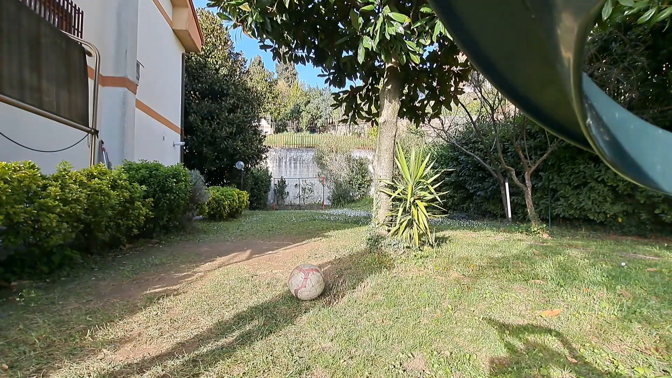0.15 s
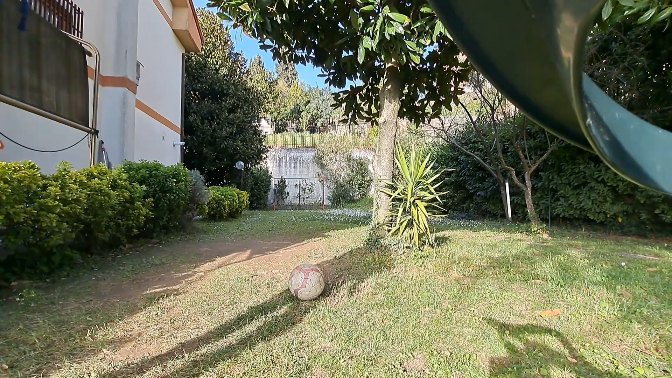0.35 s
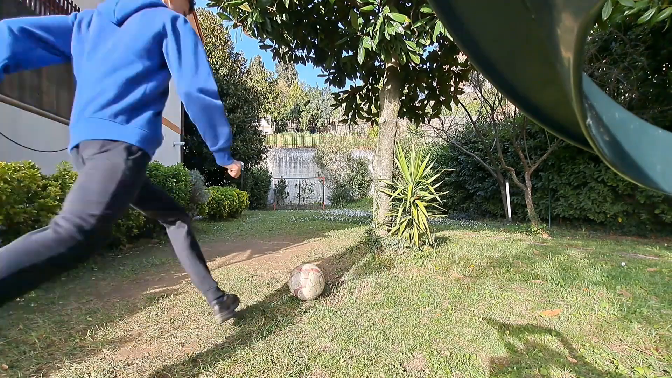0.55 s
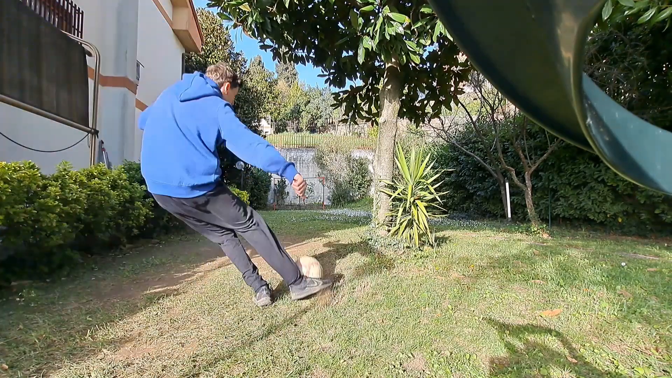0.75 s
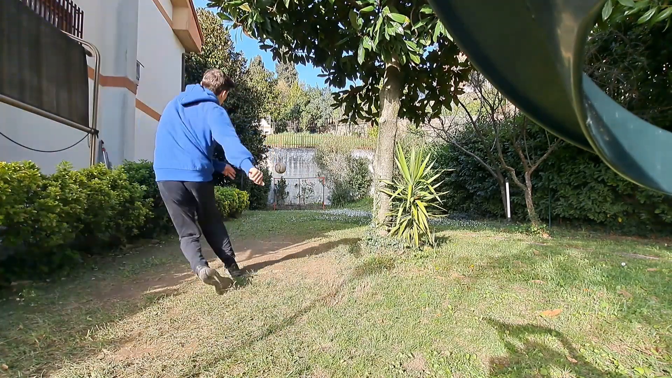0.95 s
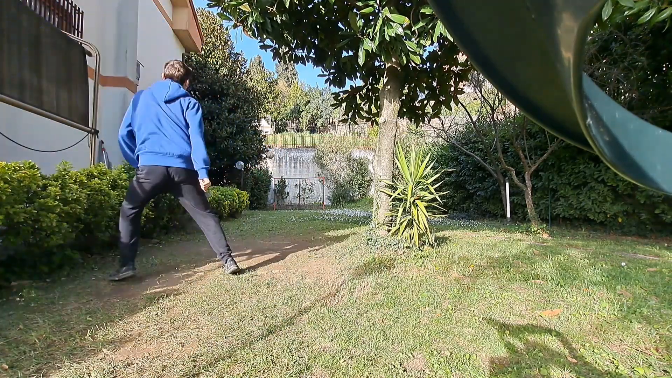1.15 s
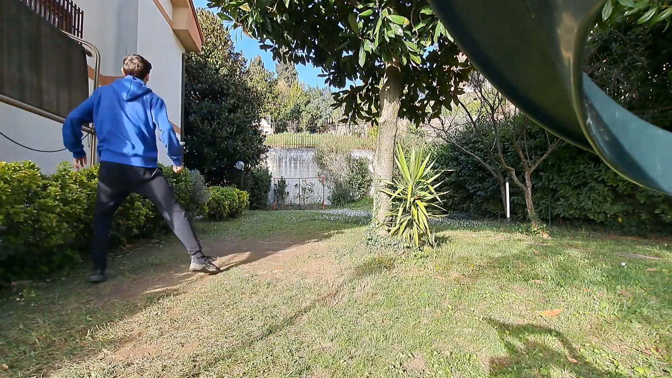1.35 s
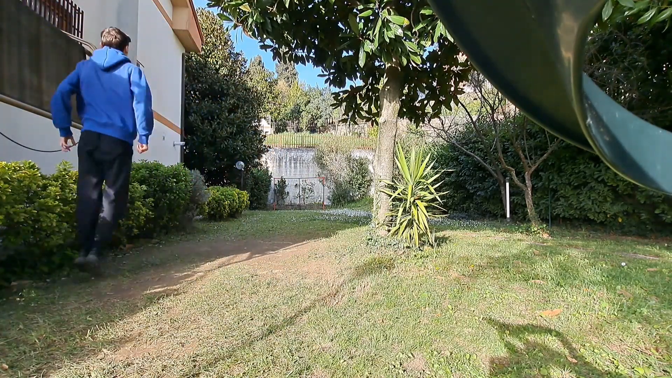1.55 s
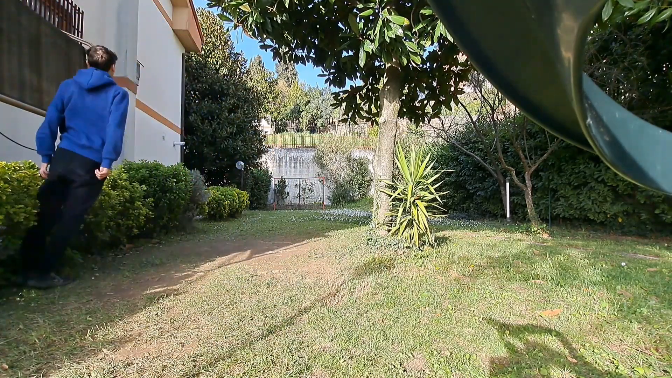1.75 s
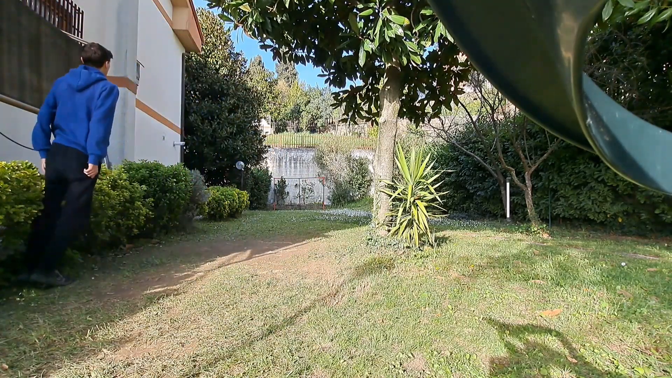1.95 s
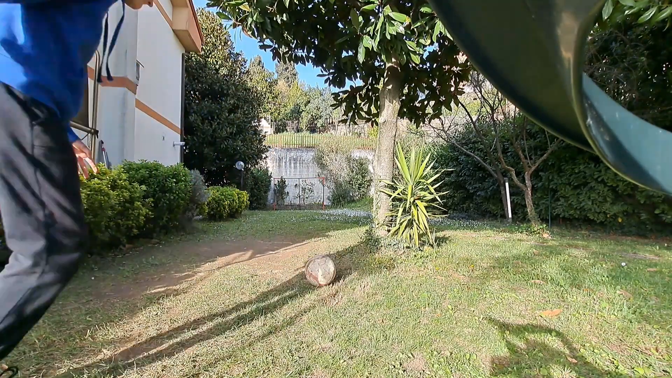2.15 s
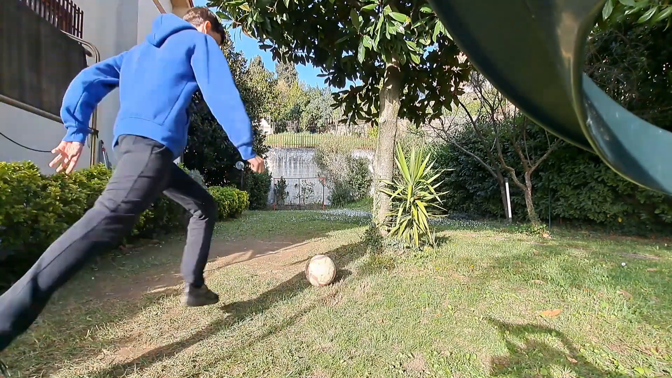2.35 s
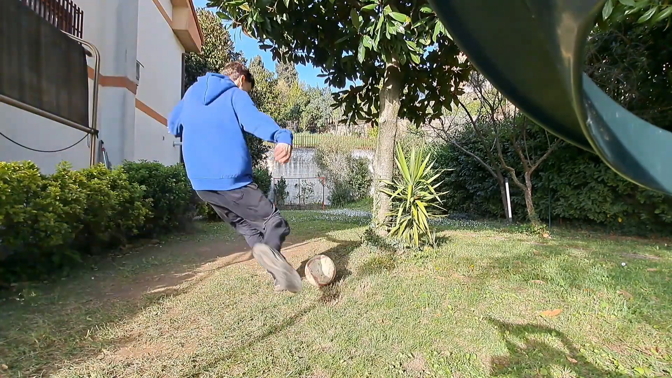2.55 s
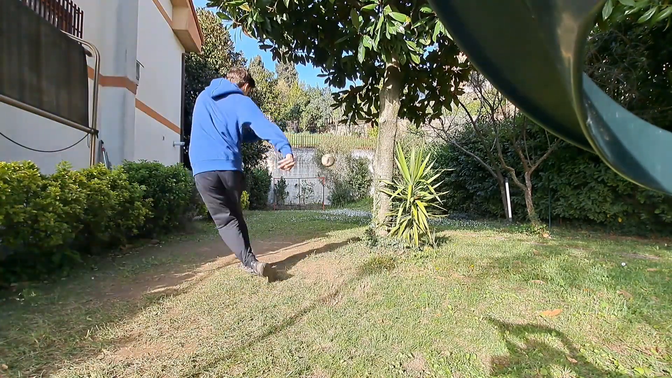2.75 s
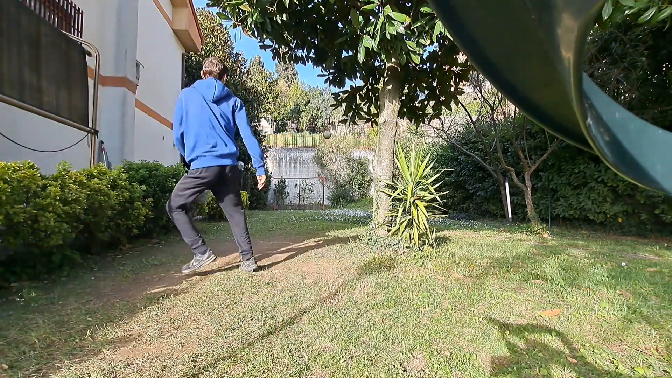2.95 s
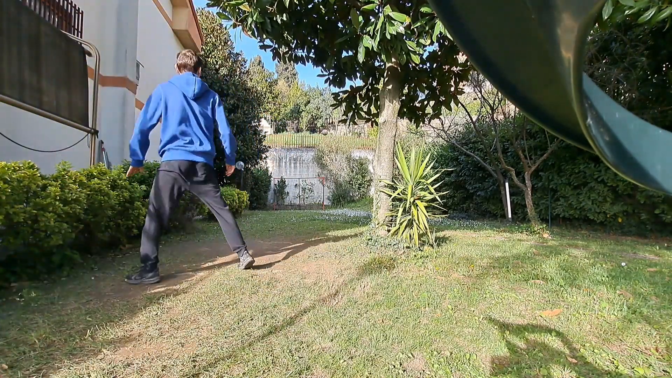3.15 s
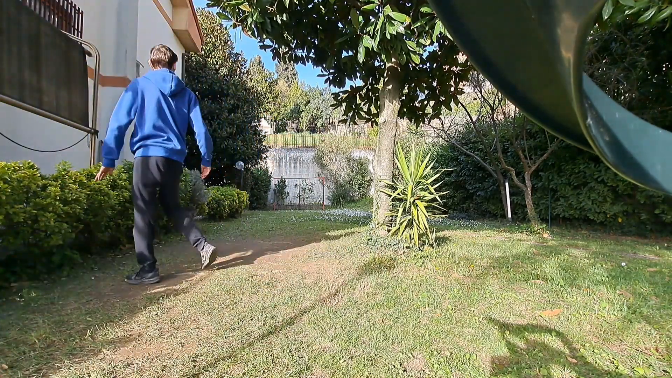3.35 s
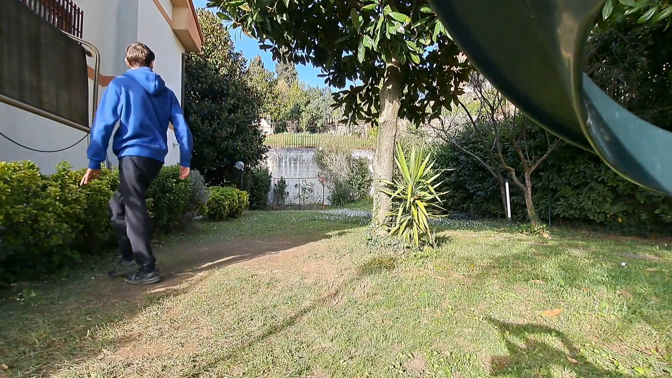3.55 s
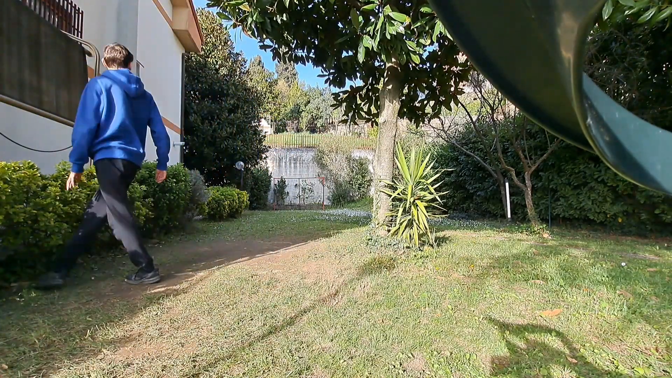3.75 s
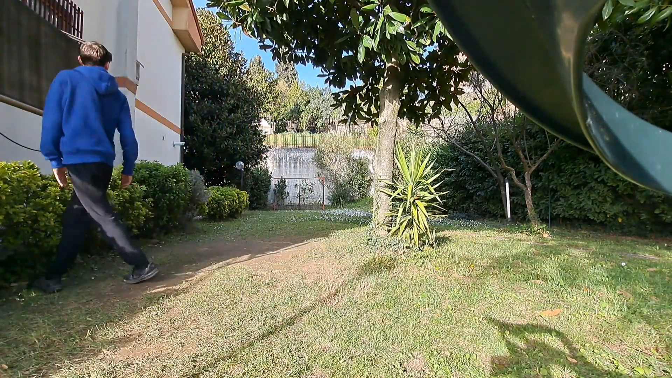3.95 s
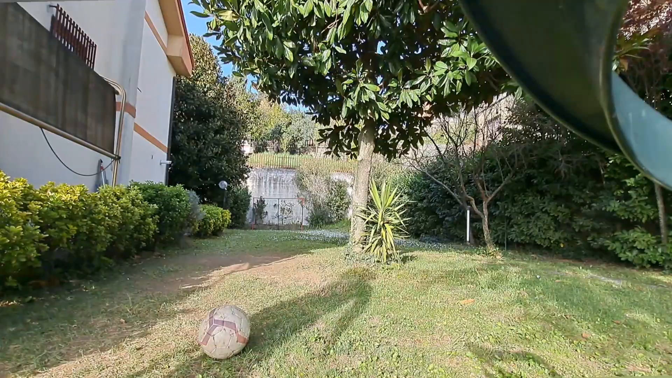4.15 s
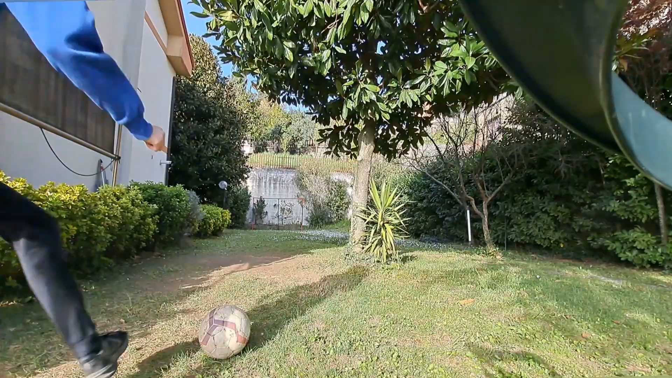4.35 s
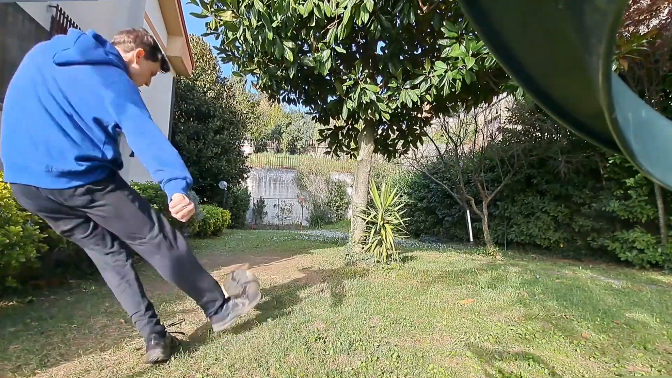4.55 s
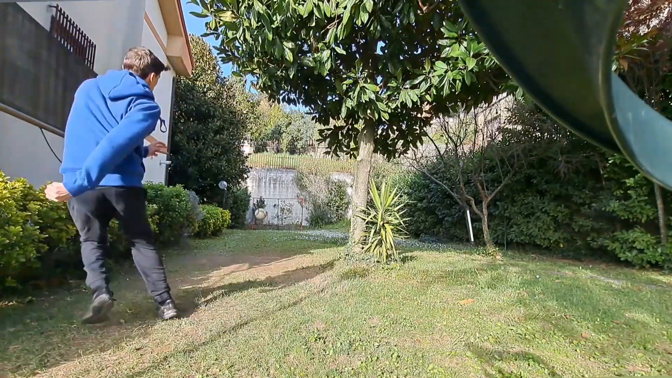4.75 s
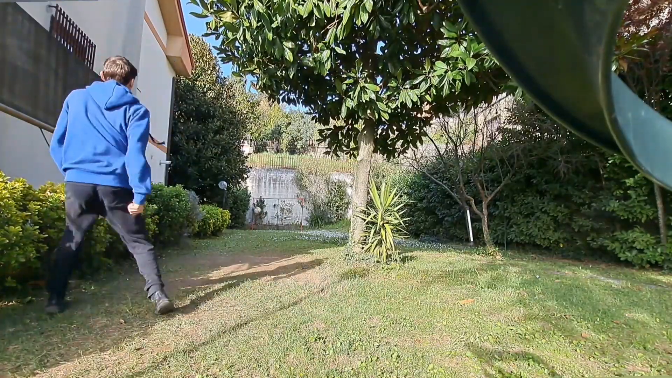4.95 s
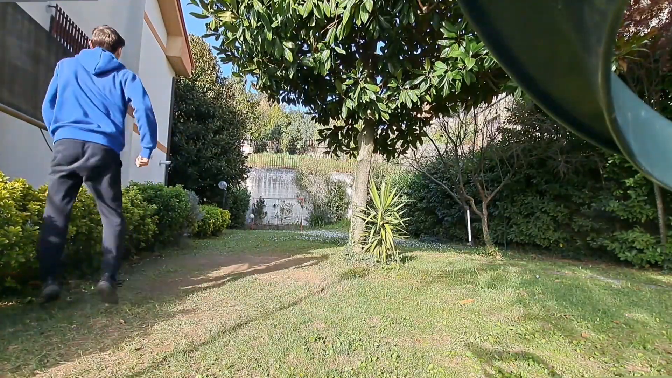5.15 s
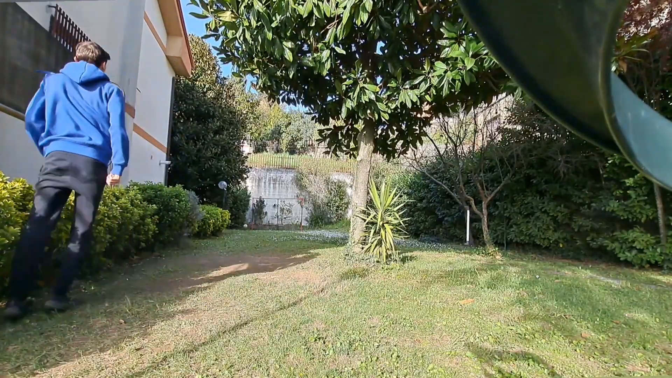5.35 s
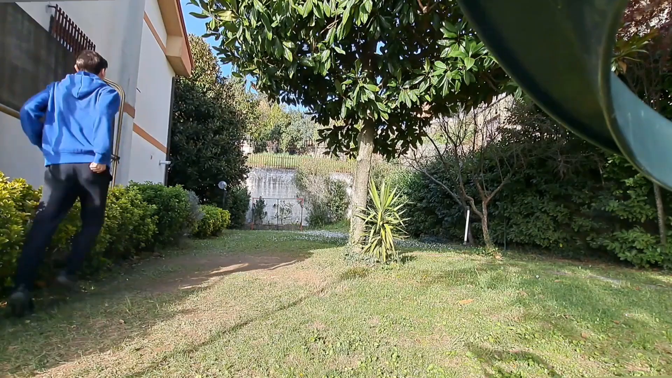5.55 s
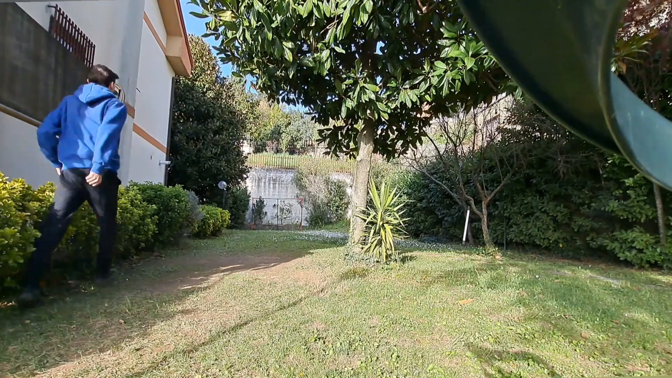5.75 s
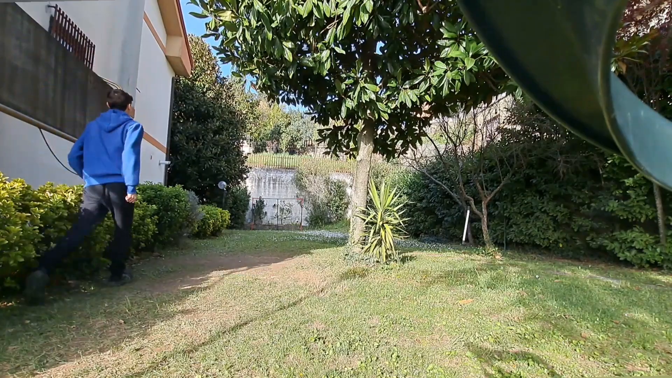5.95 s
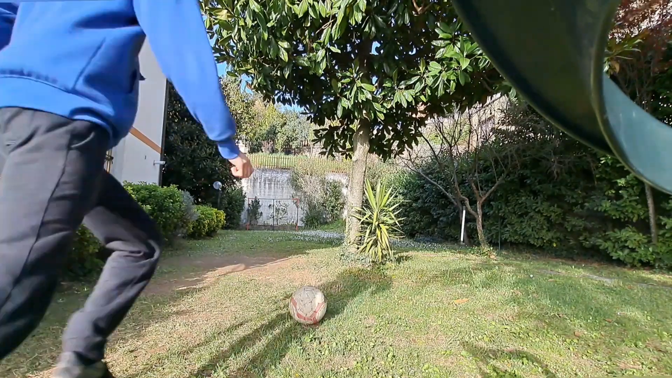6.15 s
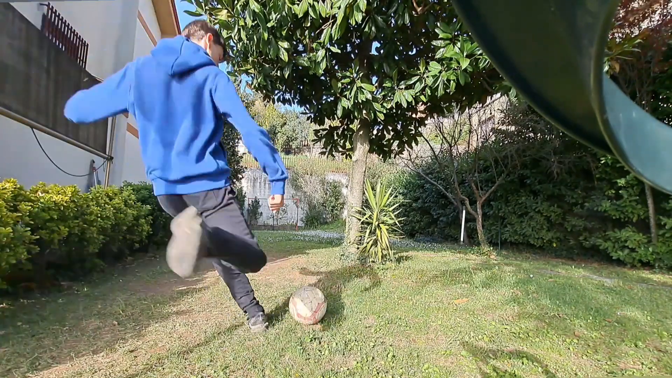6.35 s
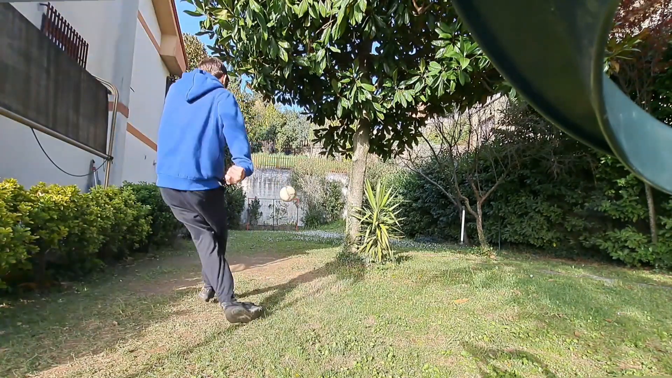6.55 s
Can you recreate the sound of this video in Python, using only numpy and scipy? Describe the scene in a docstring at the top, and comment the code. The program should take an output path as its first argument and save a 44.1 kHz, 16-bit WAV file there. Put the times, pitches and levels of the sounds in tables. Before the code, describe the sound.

Four hard football kicks land in a quiet garden, a few metres away and slightly left, at about 0.8, 2.6, 4.6 and 6.5 seconds. Each is a loud, deep thump with a sharp slap and a short echo from a wall and hedges. On the first and last, the boot skims the turf just before contact. At about 1.5 seconds the ball crashes into foliage with hissing leaves and two twig snaps. Fainter rustles come near 1.9, 3.7 and 5.6 seconds, and small wooden cracks near 2.7, 3.9 and 4.7 seconds. Around the kicks, much quieter footsteps thud in the soil and crunch dry grass, and trouser legs swish softly. Light wind puffs low against the microphone in the first half second, faintly around 4.2 seconds and again near 5.7 seconds.

```python
"""Four hard football kicks on a garden lawn, a few metres away, with a house wall on the left.
The boot dents the ball into a thump and a slap; the wall and the garden answer each kick.
The player runs up with thudding steps and swishing trouser legs, stirring grass and air.
The flying ball crashes through foliage, twigs snap, and light wind puffs at the microphone."""
import sys
import numpy as np
from scipy import signal
from scipy.fft import rfft, irfft, next_fast_len
from scipy.io import wavfile

SR = 44100
rng = np.random.default_rng(int(sys.argv[2]) if len(sys.argv) > 2 else 0)


def materialize(psi):
    """Save the field psi as 16-bit PCM at rate SR to the path in sys.argv[1].

    A 1-D psi becomes a single channel; in a 2-D psi each row is a channel.
    """
    bounded = np.clip(np.atleast_2d(psi).T, -1, 1)
    quanta = np.round(bounded * 32767).astype(np.int16)
    wavfile.write(sys.argv[1], SR, quanta)


N = 295029
TIME_S = np.arange(N) / SR

# boot meets ball: (time [s], level [dB], hardness [dB], slap [dB], garden answer [dB], left-right [dB])
KICKS = [(0.785, -1, 2.5, -26, -5.5, -2), (2.6075, 1.5, -1, -21, -8, -4),
         (4.5772, 0.45, 3.5, -22.5, -10, -2), (6.4622, 0, 2, -21, -8, -5.5)]
# spectra of ball skin, moving air and stirred grass: (frequency [Hz], level [dB])
SLAP_SPECTRUM = [(200, -20), (700, -2), (1500, 2), (3200, 0), (5000, -1), (8000, -5), (16000, -12)]
AIR_SPECTRUM = [(15, -46.5), (25, -16), (52, -0.5), (125, -9.5), (200, -17.5), (400, -29), (800, -55),
                (2000, -81)]
GRASS_SPECTRUM = [(150, 7), (450, 8), (1000, 0.5), (2000, -3.5), (3500, -5), (8000, -5), (16000, -7)]


def amp(db):
    """Decibels to gain."""
    return 10 ** (np.asarray(db) / 20)


def along(points, hz):
    """Read (Hz, value) points on a log axis."""
    f, v = np.transpose(points)
    return np.interp(np.log(hz + 1), np.log(f), v)


def pan(db):
    """Left and right gains for a level difference."""
    return amp(np.array([[db / 2], [-db / 2]]))


def filtered(x, response):
    """Apply a frequency response to x."""
    n = x.shape[-1]
    size = next_fast_len(n + SR // 4)
    return irfft(rfft(x, size) * response(np.fft.rfftfreq(size, 1 / SR)), size)[..., :n]


def shade(x, side_db):
    """Place a sound to one side; the microphone's housing shades mainly short waves."""
    shadow = [(400, 0.16), (2500, 0.36), (8000, 0.92)]  # (frequency [Hz], share of side_db [1])
    return filtered(x, lambda hz: amp(np.array([[side_db / 2], [-side_db / 2]]) * along(shadow, hz)))


def add(track, s, sound):
    """Mix a sound into a track at time s."""
    part = track[..., max(round(s * SR), 0):][..., :sound.shape[-1]]
    part += sound[..., :part.shape[-1]]


def noise(spectrum, n=N, grain_db=0, direct=0):
    """Stereo noise, mid rms 1; grain_db adds 1 ms crackles, direct is the share alike at both ports."""
    # scattered sound is alike only in the bass: (frequency [Hz], left-right likeness [1])
    likeness = [(100, .96), (300, .85), (700, .45), (1400, 0), (14000, 0)]
    ms = np.arange(n) * 1000 / SR
    knots = int(ms[-1]) + 2
    grains = amp(grain_db * np.interp(ms, np.arange(knots), rng.standard_normal(knots)))

    def mid_side(hz):
        angle = np.arccos(np.clip(direct + (1 - direct) * along(likeness, hz), -1, 1)) / 2
        return amp(along(spectrum, hz)) * [np.cos(angle), np.sin(angle)]

    mid, side = filtered(rng.standard_normal((2, n)) * grains, mid_side)
    return np.array([mid + side, mid - side]) / np.sqrt(np.mean(mid ** 2))


def burst(spectrum, rise_s, t60_s, grain_db):
    """A near puff of noise that swells and dies; rms 1 over its first 40 ms."""
    t = np.arange(SR // 2) / SR
    puff = noise(spectrum, len(t), grain_db, direct=0.48)
    puff *= (1 - np.exp(-t / rise_s)) * amp(-60 * t / t60_s)
    return puff / np.sqrt(np.mean(puff[:, :SR // 25] ** 2))


def stroke(spectrum, length_s, grain_db, direct=0):
    """Brushing: grainy noise that swells to mid-stroke and trails off."""
    u = np.arange(SR // 3) / SR / length_s
    return noise(spectrum, len(u), grain_db, direct) * (2 * u * np.exp(1 - 2 * u)) ** 2.4


def crack(t60_s):
    """A few milliseconds of bright noise."""
    t = np.arange(SR // 4) / SR
    envelope = (1 - np.exp(-t / .0006)) * amp(6 - 60 * t / t60_s)
    return noise(SLAP_SPECTRUM, len(t), grain_db=2, direct=.4) * envelope


def pulse(spectrum, size=16384):
    """Minimum-phase pulse with this spectrum."""
    cepstrum = irfft(np.log(amp(along(spectrum, np.fft.rfftfreq(size, 1 / SR)))))
    cepstrum[1:size // 2] *= 2
    cepstrum[size // 2 + 1:] = 0
    return irfft(np.exp(rfft(cepstrum)))


def swell_db(s, hold_s, rise_db_per_s, fall_db_per_s):
    """Level that climbs to 0 dB at time s, holds, then sinks."""
    return -rise_db_per_s * np.maximum(s - TIME_S, 0) - fall_db_per_s * np.maximum(TIME_S - s - hold_s, 0)


def gate(s):
    """1 throughout the kick's span that holds time s; abruptly 0 outside."""
    spans = [(0, 2.056), (2.056, 4.02), (4.02, 5.985), (5.998, 6.7)]  # one per kick: (start [s], end [s])
    return sum((TIME_S >= start) & (TIME_S < end) for start, end in spans if start <= s < end)


def garden(x, far_echo_s=.13, far_width_s=0.0075, far_gain=0.48):
    """Hedges and trees scatter the sound; the far end of the garden returns a swell of it."""
    spectrum = [(25, -39.5), (55, -4.5), (80, 1.5), (122, -1), (190, -2.5), (400, -5.5), (700, -5),
                (1100, 7), (2000, 10), (5000, 5.5), (16000, -2.5)]  # scattered sound: (frequency [Hz], level [dB])
    decay = [(80, 0.9), (250, 0.74), (1000, 0.81), (3000, 0.37), (8000, 0.32), (16000, 0.073)]  # (frequency [Hz], T60 [s])
    hz, frame_s, bands = signal.stft(noise(spectrum, SR), SR, nperseg=256)
    bands *= amp(-60 * frame_s / along(decay, hz)[:, None])
    tail = signal.istft(bands, SR, nperseg=256)[1][:, :SR]
    t = np.arange(SR) / SR
    far_swell = 1 + far_gain * np.exp(-((t - far_echo_s) / far_width_s) ** 2)
    tail = tail * (1 - np.exp(-t / 0.0032)) * far_swell
    return signal.fftconvolve(x, tail / np.linalg.norm(tail[0]), axes=1)


def walls(x, dull_hz):
    """Ground and house send back dulled copies, which comb the bass."""
    reflections = [(0.014, -0.19), (0.016, 0.48), (.035, -0.082), (.0422, -.21), (0.0616, -0.091)]  # (delay [s], signed gain [1])
    echoes = lambda hz: sum(gain * np.exp(-2j * np.pi * hz * s) for s, gain in reflections)
    return filtered(x, lambda hz: 1 + echoes(hz) / (1 + 1j * hz / dull_hz))


def movement(calm_grass_db=-83, calm_air_db=-60.5):
    """The player stirs grass and air, most from foot plant to follow-through, over a faint calm."""
    efforts = [(-60, -46, 56.5), (-64, -55.5, 68), (-57, -59.5, 28.5), (-58, -40, 31)]  # per kick: (grass [dB], air [dB], grass settling [dB/s])
    plant_lead_s, follow_through_s, run_up_db_per_s = .06, 0.1, 23.5
    air_db_per_db = 0.56
    grass, air = np.full(N, amp(calm_grass_db)), np.full(N, amp(calm_air_db))
    for (s, *_), (grass_db, air_db, fall_db_per_s) in zip(KICKS, efforts):
        effort_db = swell_db(s - plant_lead_s, plant_lead_s + follow_through_s,
                             run_up_db_per_s, fall_db_per_s)
        grass = np.hypot(grass, gate(s) * amp(grass_db + effort_db))
        air = np.hypot(air, gate(s) * amp(air_db + air_db_per_db * effort_db))
    return grass * noise(GRASS_SPECTRUM, grain_db=3) + air * noise(AIR_SPECTRUM) * pan(-1.5)


def wind():
    """Each microphone port is buffeted by its own eddies."""
    gusts = [(0.088, 0.078, -48.5, 5), (0.239, 0.11, -38.5, -7), (0.342, 0.11, -40.5, -21),
             (0.467, 0.065, -38, -11), (1.927, 0.1, -44, 4.5), (4.125, 0.055, -46, 0),
             (4.314, 0.081, -43.5, -8), (5.34, 0.17, -50.5, 4), (5.627, 0.14, -35, 5),
             (5.725, 0.033, -37, -10), (5.877, 0.057, -44.5, -0.5)]  # (time [s], length [s], level [dB], left-right [dB])
    out = np.zeros((2, N))
    for s, length_s, db, side_db in gusts:
        ports = np.array([stroke(AIR_SPECTRUM, length_s, grain_db=2.0)[0] for _ in "LR"])
        add(out, s, amp(db) * ports * pan(side_db))
    return out


def swishes():
    """Trouser legs brush past each other and hiss."""
    strides = [(0.031, 0.056, -55.5, 8.5), (0.125, 0.037, -65, 7), (0.306, 0.056, -53.5, 8.5),
               (0.519, 0.048, -50, 11.5), (0.643, 0.042, -54, 2), (0.932, 0.084, -49.5, -3),
               (1.212, 0.056, -49, 0), (1.726, 0.065, -50.5, 4), (2.096, 0.07, -60, 10.5),
               (2.34, 0.054, -51.5, 7), (2.749, 0.068, -59.5, 1.5), (3.114, 0.051, -68.5, 2),
               (4.316, 0.045, -47, 1.5), (4.907, 0.043, -53, 0.5), (5.334, 0.113, -66.5, 2.5),
               (5.996, 0.023, -45, 4.5), (6.195, 0.039, -47.5, 8), (6.613, 0.079, -53, -3.5)]  # (time [s], length [s], level [dB], left-right [dB])
    cloth = [(200, -26.5), (500, -5.5), (1200, -10), (2100, -3.5), (3000, -9.5), (4500, -11), (7000, -10),
             (12000, -6.5), (16000, -13)]  # (frequency [Hz], level [dB])
    out = np.zeros((2, N))
    for s, length_s, db, side_db in strides:
        add(out, s, amp(db) * shade(stroke(cloth, length_s, grain_db=2.5), side_db))
    return out


def foliage(branch_db=-3.5):
    """The ball sets twigs clattering, leaves hissing and branches shuddering; leaves settle first."""
    touches = [(1.39, .06, -60.5, -57), (1.483, .02, -42, -46), (1.525, 0.011, -33.5, -43),
               (1.931, 0.054, -49.5, -58.5), (3.731, 0.23, -47.5, -53.5), (5.59, 0.099, -53.5, -58),
               (5.874, .1, -66, -68)]  # (time [s], hold [s], twigs [dB], leaves [dB])
    twig_spectrum = [(100, 1.5), (350, 0), (700, -2.5), (1200, -6.5), (1600, -2.5), (2600, -6.5),
                     (4000, -10.5), (6500, -11), (16000, -49)]  # (frequency [Hz], level [dB])
    leaf_spectrum = [(2000, -26.5), (4200, 0), (7000, 1), (12000, 0), (16000, -8)]  # (frequency [Hz], level [dB])
    rise_db_per_s, twig_fall_db_per_s, leaf_fall_db_per_s = 623, 79.5, 101
    twigs, leaves = np.zeros(N), np.zeros(N)
    for s, hold_s, twigs_db, leaves_db in touches:
        twig_swell = amp(twigs_db + swell_db(s, hold_s, rise_db_per_s, twig_fall_db_per_s))
        leaf_swell = amp(leaves_db + swell_db(s, hold_s, rise_db_per_s, leaf_fall_db_per_s))
        twigs = np.hypot(twigs, gate(s) * twig_swell)
        leaves = np.hypot(leaves, gate(s) * leaf_swell)
    clatter, hiss = noise(twig_spectrum, grain_db=4), noise(leaf_spectrum, grain_db=3.5)
    shudder = amp(branch_db) * noise(AIR_SPECTRUM)
    return twigs * (clatter + shudder) * pan(-2.0) + leaves * hiss * pan(-2.6)


def snaps(q=2.5):
    """Twigs snap and branches knock, each with one broad resonance; thick ones sound lower. The two faint ticks
    in the first quarter second are dry grass blades."""
    cracks = [(0.031, -51, 3470), (0.237, -61, 4070), (1.4765, -27, 1600), (1.516, -26.5, 2010),
              (2.574, -40.5, 1630), (2.748, -32.5, 952), (2.757, -33, 1060), (3.743, -35, 1510),
              (3.9196, -34, 1680), (4.143, -46, 1954), (4.726, -36, 845), (5.525, -58, 870),
              (5.635, -42, 780), (5.855, -47, 890), (6.3023, -44.5, 2160)]  # (time [s], level [dB], pitch [Hz])
    out = np.zeros((2, N))
    for s, db, pitch_hz in cracks:
        wood = lambda hz: 1j * hz * pitch_hz / q / (pitch_hz ** 2 - hz ** 2 + 1j * hz * pitch_hz / q)
        add(out, s, amp(db) * filtered(crack(t60_s=0.019), wood))
    return out * pan(-2)


def steps():
    """Feet and the landing ball thud in the soil and crunch dry grass."""
    impacts = [(.645, -42.5, -50.5), (1.515, -36.5, -50.5), (2.493, -39, -47), (2.744, -33, -41.5),
               (3.116, -55.5, -64), (3.915, -34.5, -55), (3.959, -34, -60), (4.19, -46.5, -67.5),
               (4.456, -32.5, -46), (4.72, -29, -44), (4.917, -45, -56.5), (5.518, -40, -49),
               (5.63, -44.5, -45), (5.851, -51.5, -56.5), (6.338, -33.5, -46)]  # (time [s], thud [dB], scuff [dB])
    thud = [(25, -27.5), (55, -6), (120, 0.5), (220, -11.5), (400, -20.5), (800, -37.5), (2000, -68)]  # soil: (frequency [Hz], level [dB])
    scuff = [(150, -11.5), (400, 11), (900, 2.5), (1600, -11.5), (3000, -18.5), (7000, -21.5), (16000, -23)]  # dry grass: (frequency [Hz], level [dB])
    out = np.zeros((2, N))
    for s, thud_db, scuff_db in impacts:
        step = np.zeros((2, N))
        add(step, s, amp(thud_db) * burst(thud, rise_s=.003, t60_s=.17, grain_db=0))
        add(step, s, amp(scuff_db) * burst(scuff, rise_s=0.0048, t60_s=0.19, grain_db=3.0))
        out += gate(s) * step
    return out * pan(-1.5)


def skims(graze_db=-15.0, spray_db=-28.5):
    """The boot grazes, then skims the turf just before the ball: blades crackle, torn bits scatter."""
    swings = [(0.7716, .009, -20.5), (6.446, .013, -23.5)]  # (time [s], length [s], level [dB])
    turf = [(100, -11), (400, 4.5), (1000, 5), (1700, 2), (4000, -1.5), (9000, -3), (16000, -6)]  # (frequency [Hz], level [dB])
    out = np.zeros((2, N))
    for s, length_s, db in swings:
        add(out, s - .006, amp(db + graze_db) * stroke(turf, 2 * length_s, grain_db=3.5))
        add(out, s, amp(db) * stroke(turf, length_s, grain_db=3, direct=.5))
        spray = burst(GRASS_SPECTRUM, rise_s=.004, t60_s=.3, grain_db=4)
        add(out, s + length_s, amp(db + spray_db) * spray)
    return out * pan(-2.5)


def kicks(click_db=19):
    """The boot dents the ball: a sharp suction, a few slow swings of air and the slap of the skin."""
    thump_spectrum = [(15, -50), (25, -15), (45, 33), (65, 45), (100, 46), (135, 42), (200, 32),
                      (290, 27.5), (500, 24), (780, 14), (1000, 1), (1500, 4), (2800, -7), (10000, -45)]  # (frequency [Hz], level [dB])
    # a shorter contact lifts the thump's middle: (frequency [Hz], share of hardness [1])
    lift = [(170, 0), (450, 0.93), (900, 0.55), (2000, 0)]
    out, size = np.zeros((2, N)), SR // 4
    click = -pulse(SLAP_SPECTRUM)[:size]  # heard only through the garden
    for s, db, hard_db, slap_db, garden_db, side_db in KICKS:
        spectrum = [(hz, level + db + hard_db * along(lift, hz)) for hz, level in thump_spectrum]
        thump = walls(-pulse(spectrum)[:size], dull_hz=980)
        scattered = garden(thump[None] + amp(slap_db + click_db) * click)
        add(out, s, shade(thump + amp(slap_db) * crack(t60_s=0.0089), side_db))
        add(out, s, amp(garden_db) * shade(scattered, side_db=-4))
    return out * pan(-1.7)


def scene():
    """Mix all sources; the small sounds ring faintly in the garden too."""
    small = skims() + steps() + swishes() + snaps()
    return kicks() + small + amp(-15) * garden(small)[:, :N] + foliage() + wind() + movement()


def record(dry, top_hz=15950):
    """The two microphone ports colour the sound; it is clipped at full scale and band-limited."""
    response = [(5000, 0), (6200, -2.5), (7100, 3), (7950, 3.5), (8400, -4), (10500, -3), (12700, 2),
                (15500, -4)]  # (frequency [Hz], gain [dB])
    # more presence on the right, more top treble on the left: (frequency [Hz], left-right [dB])
    balance = [(600, 0), (2000, -2.5), (5000, -4), (9000, 3), (14000, 6)]
    coloured = filtered(dry, lambda hz: amp(along(response, hz) + np.outer([.5, -.5], along(balance, hz))))
    return filtered(np.clip(coloured, -1, 1), lambda hz: hz < top_hz)


dry = scene()
out = record(dry)
materialize(out)
```